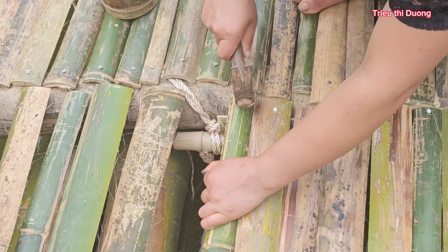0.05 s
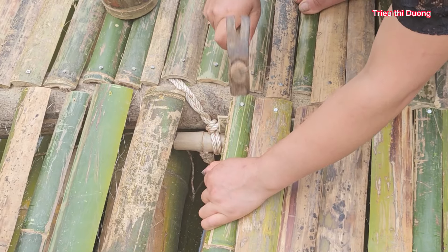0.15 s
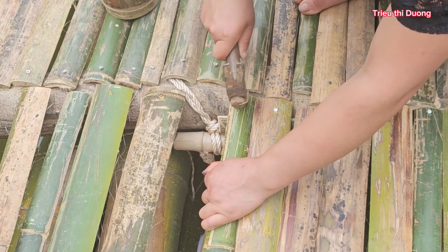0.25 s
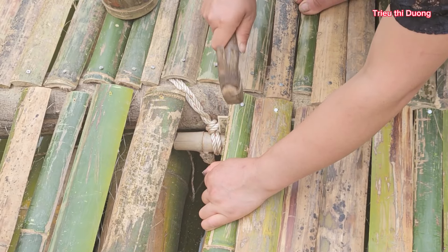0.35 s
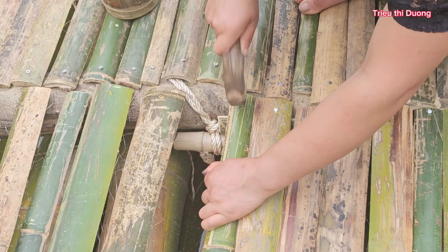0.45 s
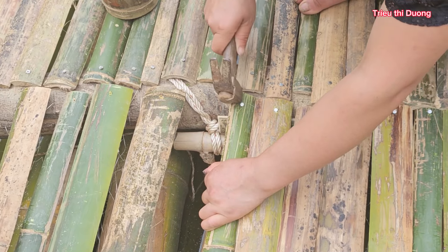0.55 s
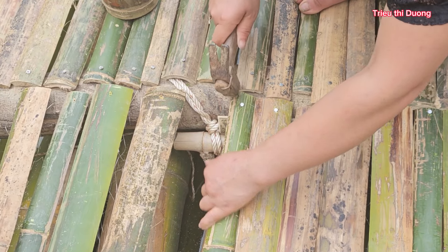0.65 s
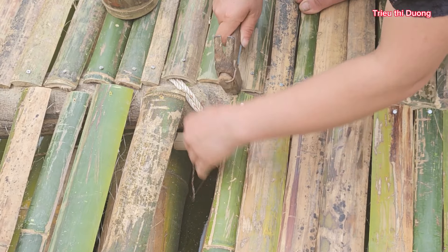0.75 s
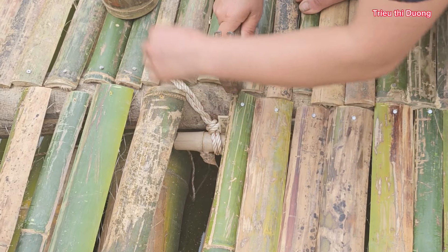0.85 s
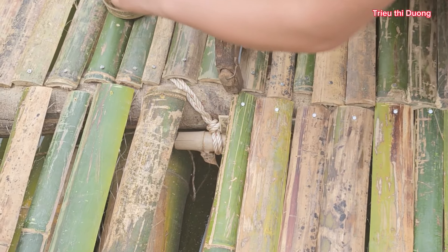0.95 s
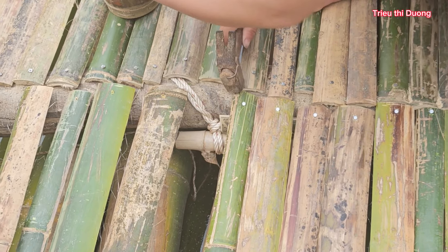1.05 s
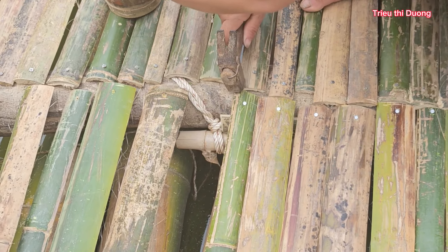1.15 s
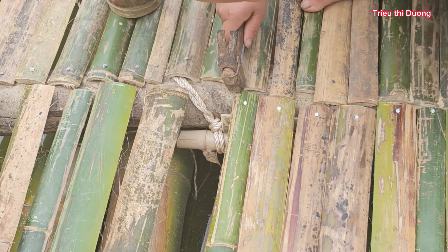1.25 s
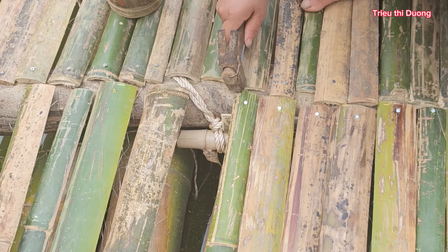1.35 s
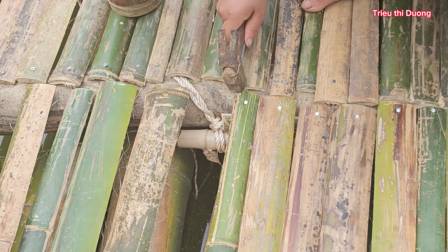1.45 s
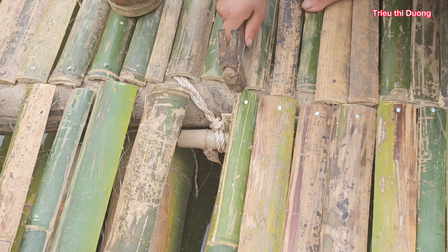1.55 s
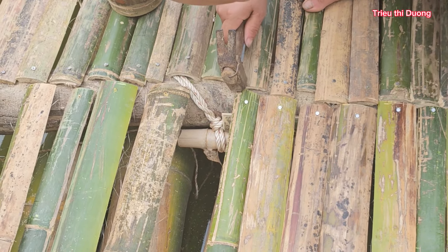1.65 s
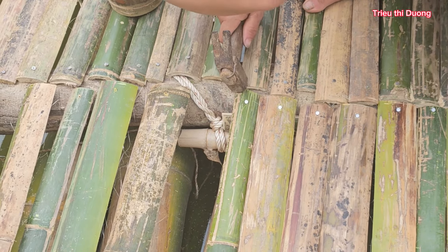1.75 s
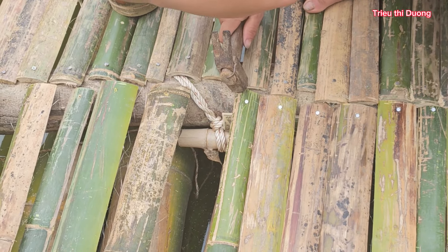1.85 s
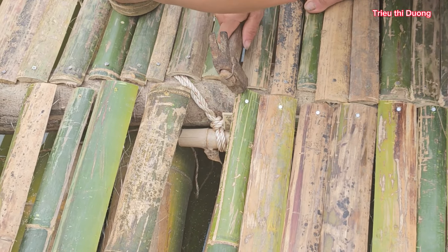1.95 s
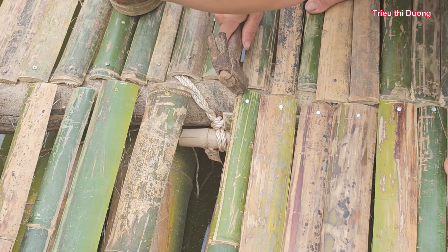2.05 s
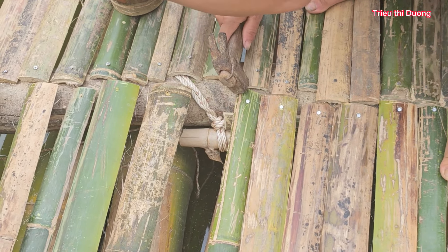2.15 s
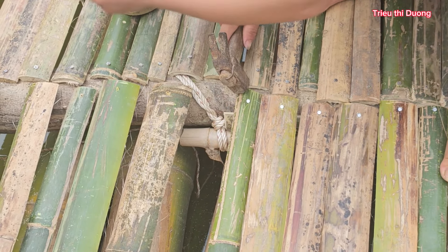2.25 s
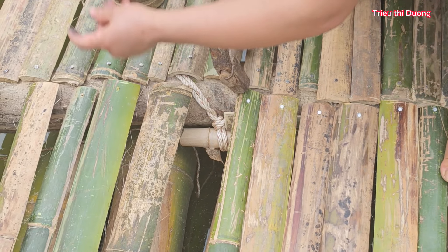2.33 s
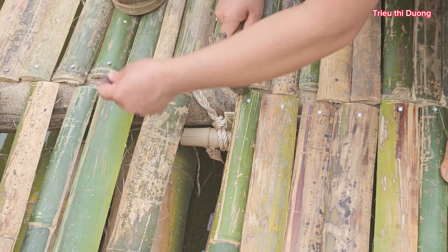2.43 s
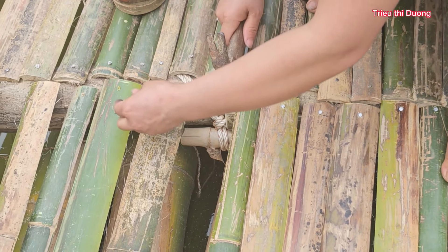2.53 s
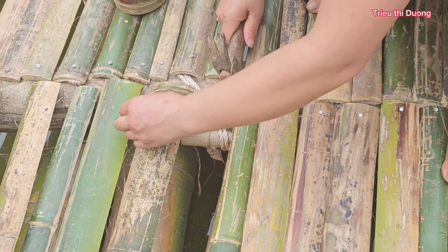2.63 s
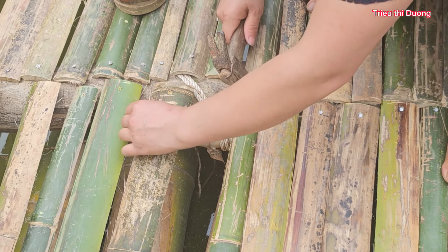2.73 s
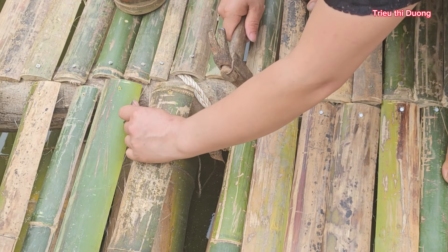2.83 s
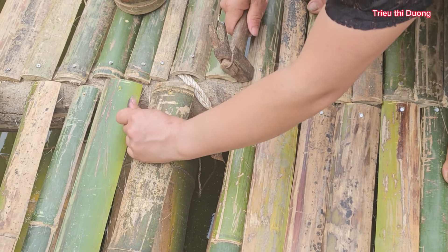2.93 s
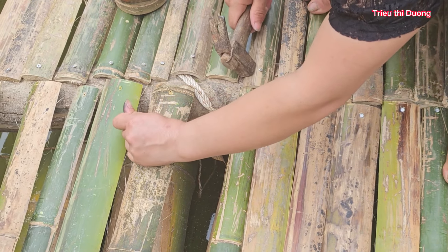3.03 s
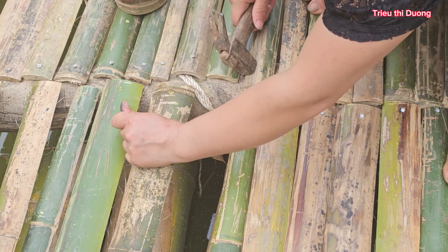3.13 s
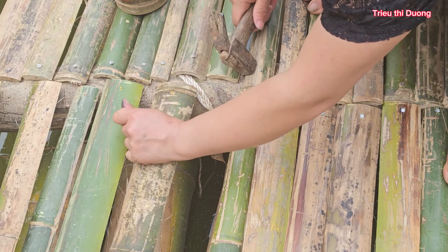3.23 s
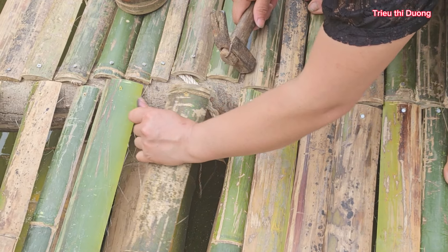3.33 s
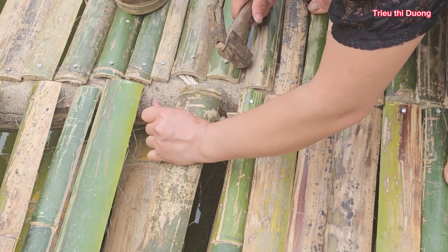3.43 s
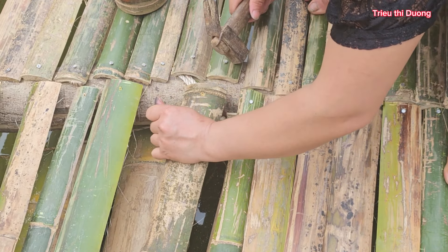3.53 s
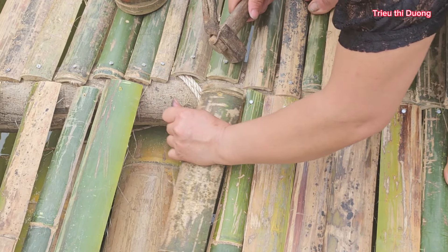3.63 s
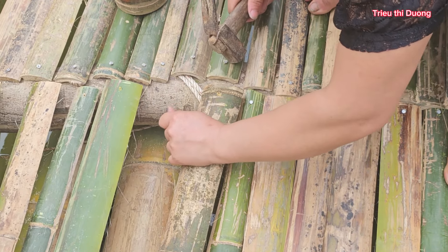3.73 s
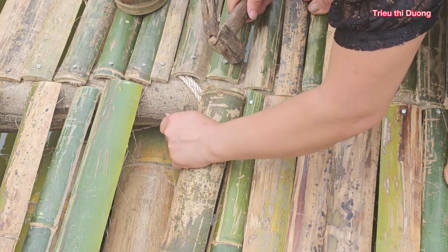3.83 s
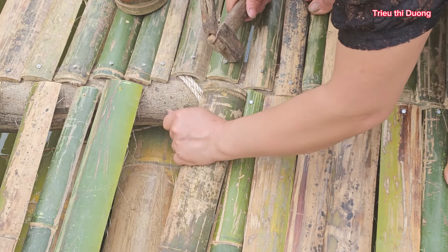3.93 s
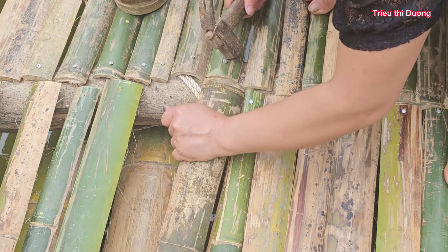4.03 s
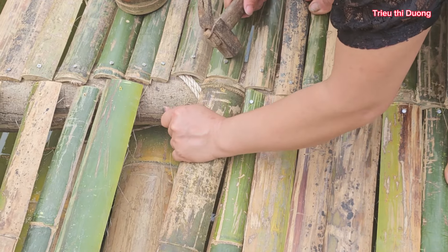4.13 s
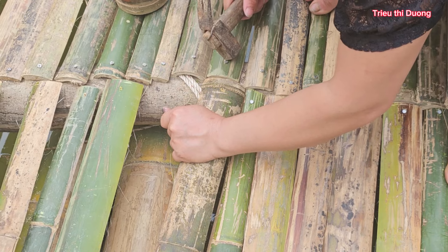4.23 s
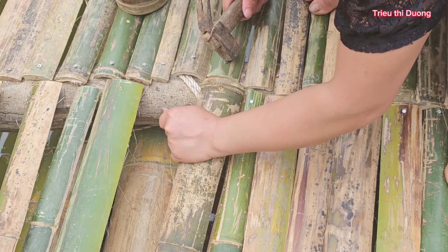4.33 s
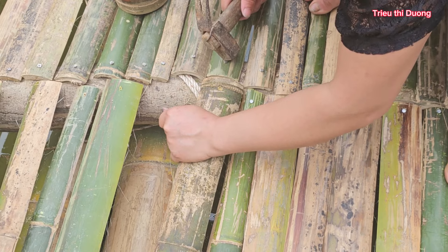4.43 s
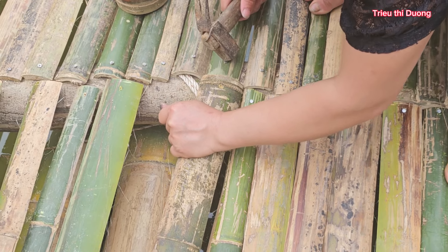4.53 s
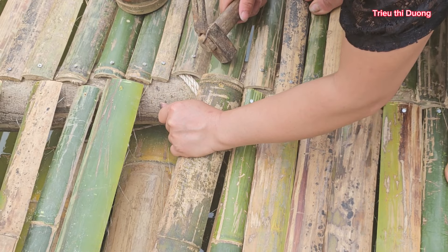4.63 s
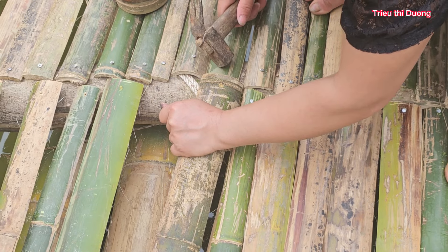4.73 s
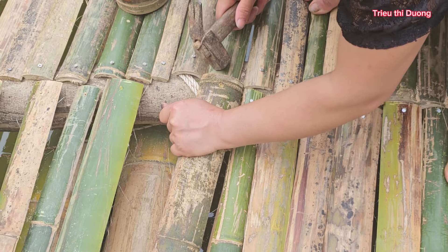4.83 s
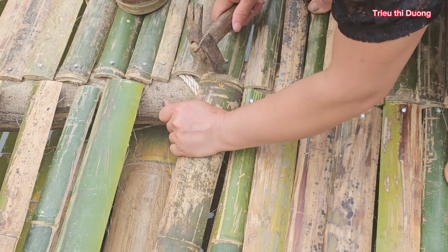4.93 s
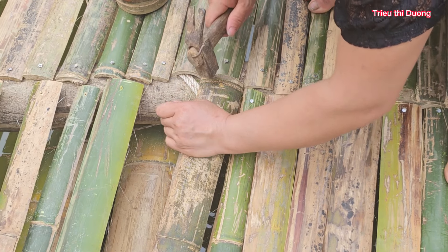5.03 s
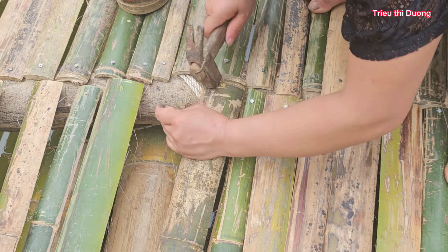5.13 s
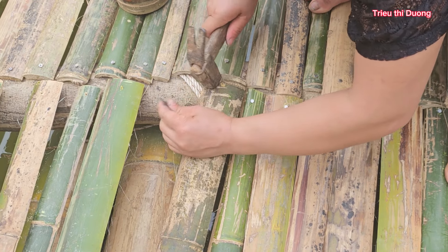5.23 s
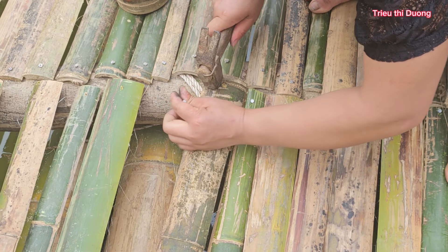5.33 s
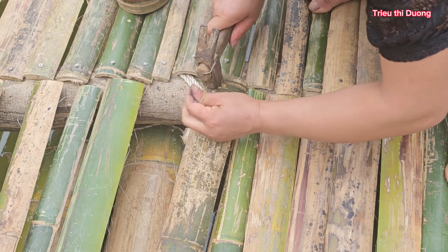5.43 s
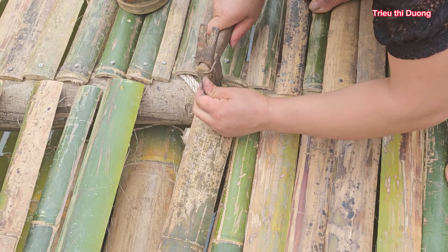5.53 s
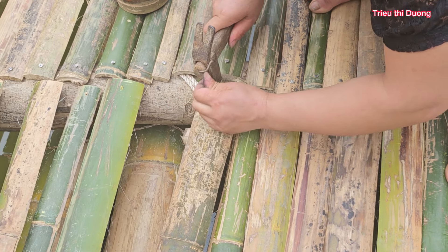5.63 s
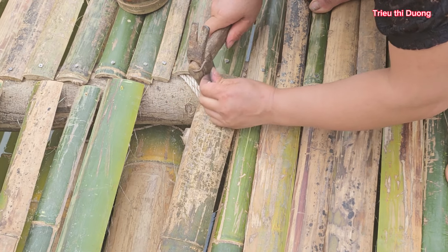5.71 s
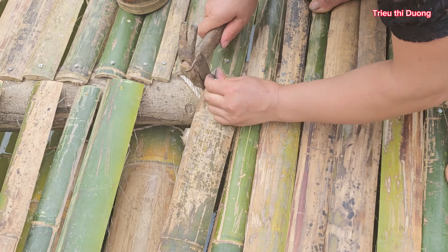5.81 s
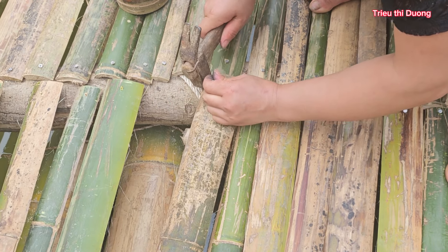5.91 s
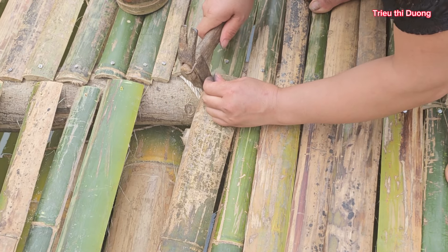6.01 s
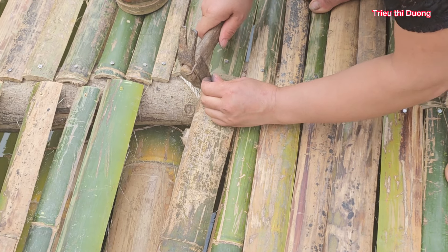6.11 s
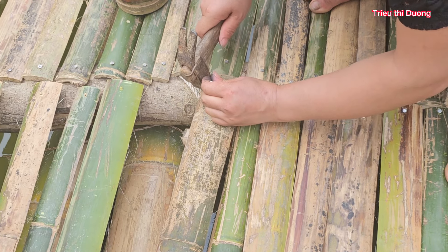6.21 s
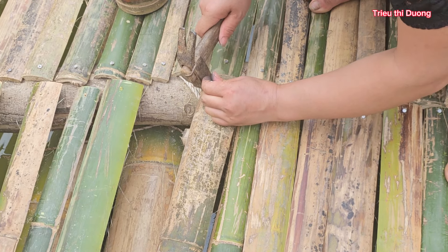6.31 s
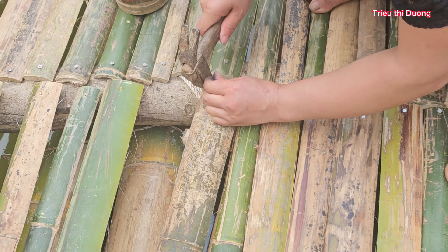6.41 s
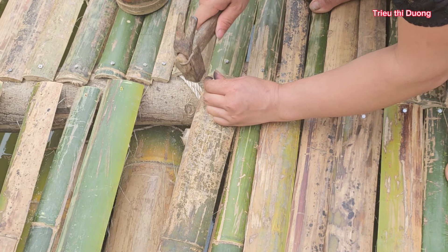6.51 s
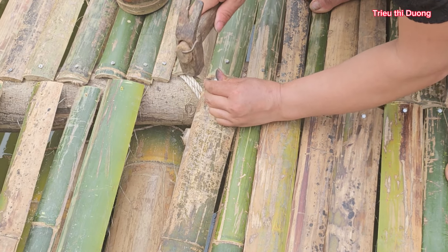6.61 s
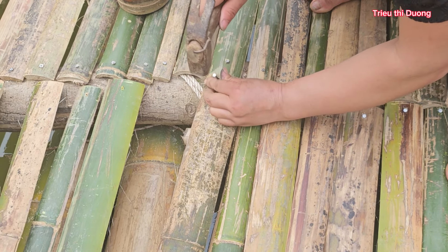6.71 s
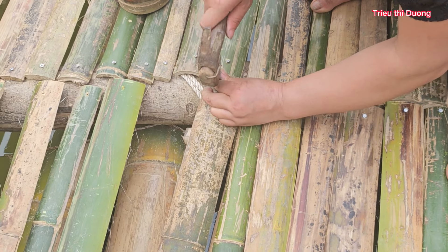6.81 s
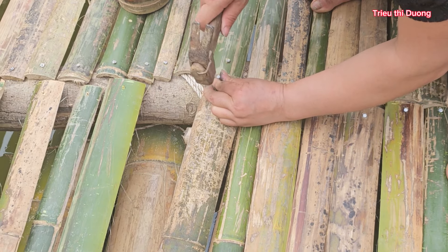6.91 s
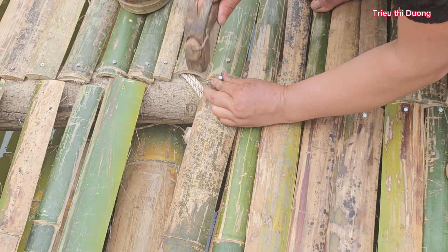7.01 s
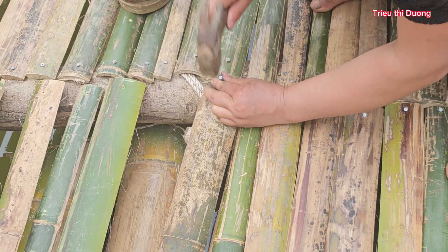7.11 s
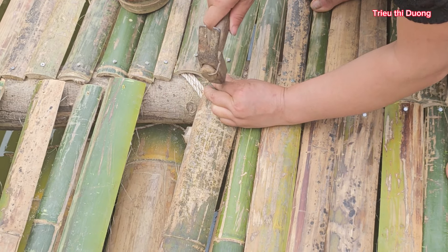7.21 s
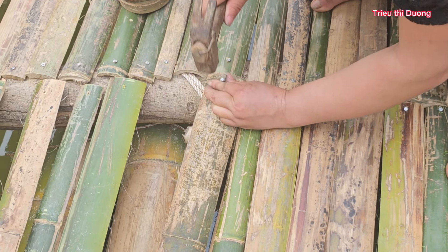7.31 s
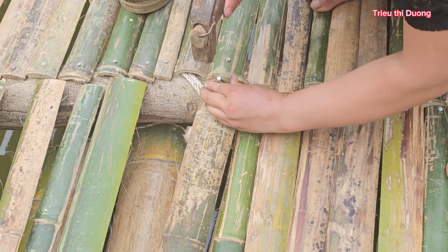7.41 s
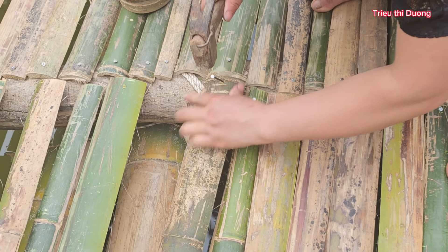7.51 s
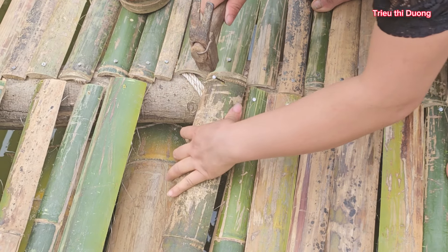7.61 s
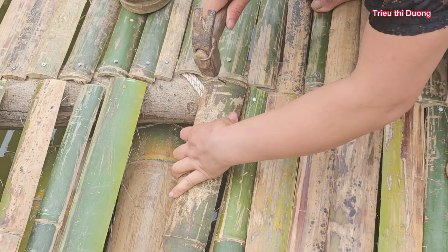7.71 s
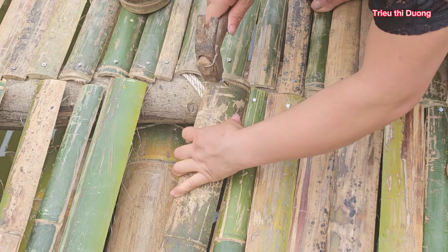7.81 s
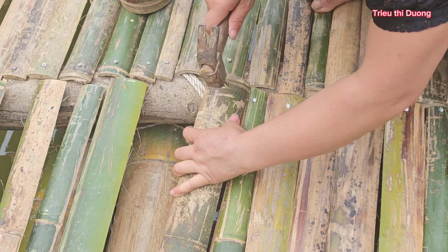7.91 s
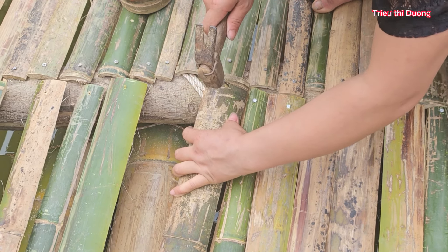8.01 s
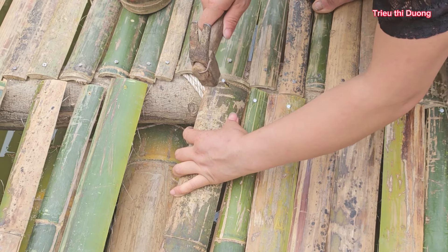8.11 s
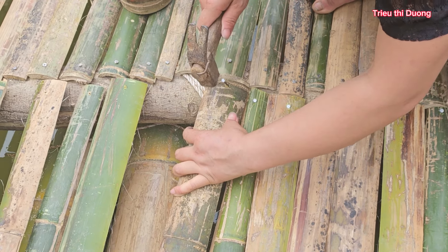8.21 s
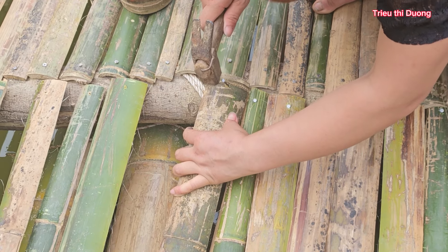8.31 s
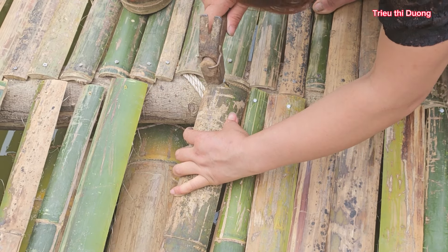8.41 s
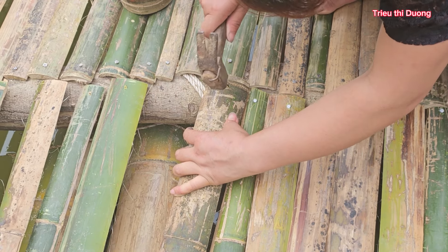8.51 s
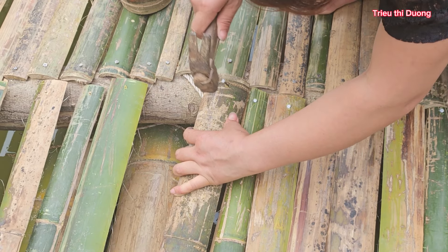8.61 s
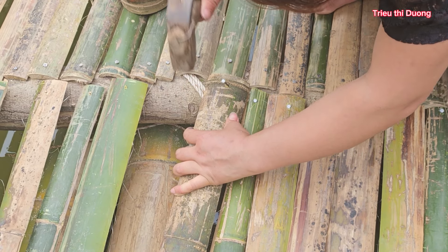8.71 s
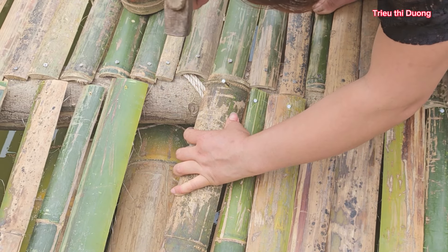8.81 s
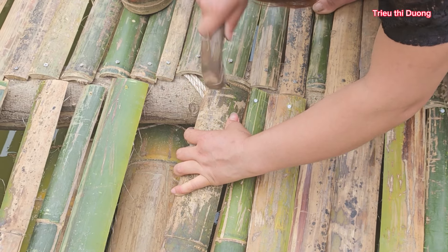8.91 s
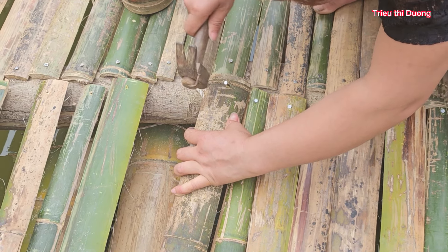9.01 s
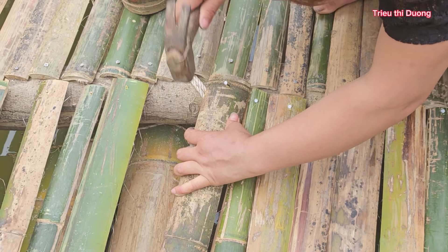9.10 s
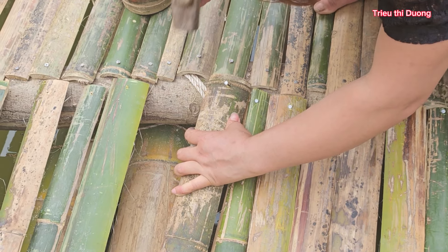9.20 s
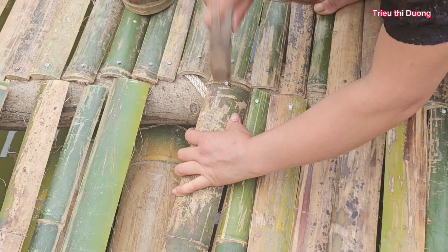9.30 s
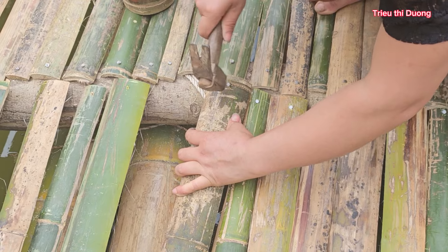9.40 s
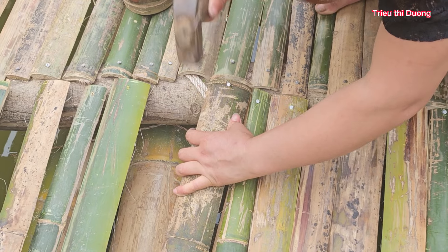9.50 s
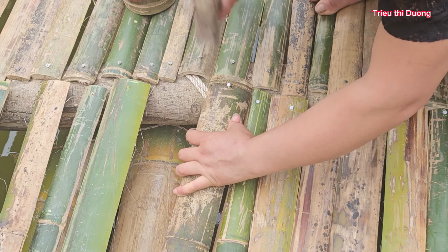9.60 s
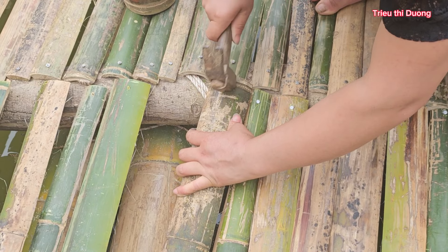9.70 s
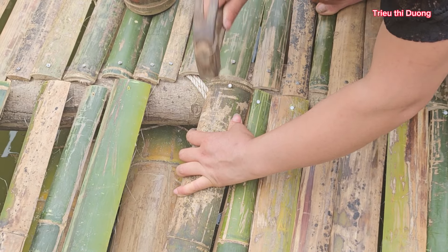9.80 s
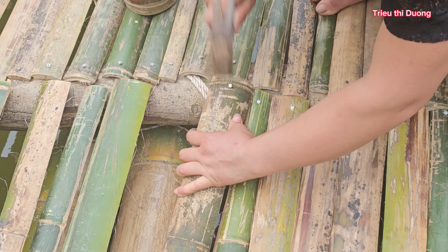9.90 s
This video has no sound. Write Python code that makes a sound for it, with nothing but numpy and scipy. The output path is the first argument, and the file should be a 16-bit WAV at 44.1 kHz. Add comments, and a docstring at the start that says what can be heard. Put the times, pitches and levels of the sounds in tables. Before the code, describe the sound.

Close outdoors on a bamboo deck, a hammer cracks three times on a nail. Light bumps, finger ticks and tiny nail clinks follow, then short dry scrapes as a slat slides into place. A dull hollow clack, two setting taps, the second with a bright ping, and four hard uneven blows finish. Thin insect drone and a repeated swooping bird whistle sit far behind.

```python
"""Hammer blows close by: three finish one nail in split bamboo slats on a pole deck; a slat is slid into place
and a new nail is set and driven. Blows are noise and slat modes in four bands, dulled by contact time, with
rebounds; drags are sparse grains through slat modes; nails and hollow culms are decaying sines.
Behind: an insect drone of shaped noise that sinks and swells, a repeated whistle that swoops up and drops,
far chips and hoots as gliding sines, and forest scatter with a blurred echo as noise tails."""
import sys
import numpy as np
from scipy import signal
from scipy.fft import rfft, irfft, next_fast_len
from scipy.io import wavfile
from scipy.ndimage import map_coordinates

SR = 44100
rng = np.random.default_rng(int(sys.argv[2]) if len(sys.argv) > 2 else 0)


def master_out(mix):
    """Clip the mix to full scale and print it as 16-bit PCM to the path in sys.argv[1]."""
    frames = np.transpose(np.atleast_2d(mix))
    ceiling = np.clip(frames, -1, 1)
    pcm = np.round(ceiling * 32767).astype(np.int16)
    wavfile.write(sys.argv[1], SR, pcm)


N = 438794
TIME = np.arange(N) / SR
RING = np.arange(SR // 2) / SR  # time axis of one event, s


def amp(db):
    """Decibels to gain."""
    return 10 ** (np.asarray(db) / 20)


def unit(x):
    """Scale to rms 1."""
    return x / np.sqrt(np.mean(x ** 2) + 1e-20)


def along(points, hz):
    """Interpolate (f/Hz, value) points on a log frequency axis."""
    f, v = np.transpose(points)
    return np.interp(np.log(hz + 1), np.log(f + 1), v)


def add(track, s, x):
    """Mix x into the track at time s."""
    part = track[..., max(round(s * SR), 0):][..., :x.shape[-1]]
    part += x[..., :part.shape[-1]]


def wobble(rate_hz):
    """Smooth random curve with rate_hz knots a second."""
    knots = rng.standard_normal(int(N * rate_hz / SR) + 4)
    return map_coordinates(knots, [TIME * rate_hz])


def filtered(x, response):
    """Apply a frequency response to x."""
    n = x.shape[-1]
    m = next_fast_len(n + 8192)
    spectrum = rfft(x, m) * response(np.fft.rfftfreq(m, 1 / SR))
    return irfft(spectrum, m)[..., :n]


def coloured(x, spectrum):
    """Shape noise to a spectrum, at rms 1."""
    return unit(filtered(x, lambda hz: amp(along(spectrum, hz))))


def dying(spectrum, t60, size):
    """Two noises, jointly rms 1, whose frequencies decay at their own rates."""
    hz, t, z = signal.stft(rng.standard_normal((2, size)), SR, nperseg=256)
    decay_db = 60 * t / along(t60, hz)[:, None]
    gain = amp(along(spectrum, hz)[:, None] - decay_db)
    return unit(signal.istft(z * gain, SR)[1][:, :size])


# level difference of the two ports: f/Hz, left minus right/dB
PORT_LEAN = [(250, 0), (600, -0.5), (1500, -0.5), (3000, -5.5), (5500, -10.5), (8500, 4.5), (13000, -2.5)]


def ports(pair, apart, lead_ms=0.097):
    """Close source at two microphone ports: left leads; the sides differ more in the treble."""
    mid = pair[0]
    side = apart * filtered(pair[1], lambda hz: 0.38 + hz / (hz + 1500))
    sign = np.array([[1], [-1]])

    def port_response(hz):
        """Half the lean and half the lead, opposite at each port."""
        return amp(sign * along(PORT_LEAN, hz) / 2) * np.exp(sign * 1j * np.pi * hz * lead_ms / 1000)

    return filtered(mid + sign * side, port_response)


# insect chorus level: t/s, level/dB
CHORUS_LEVEL = [(0, -62.5), (1.2, -73), (2.8, -67.5), (5, -67), (9.9, -65)]
# insect spectrum: f/Hz, level/dB
INSECT_SPECTRUM = [(4500, -38), (5700, -15), (6600, -7), (7100, -2.5), (7500, 4), (7900, -7.5),
                   (8300, -14.5), (8900, -44.5)]
# air spectrum: f/Hz, level/dB
AIR_SPECTRUM = [(20, -4), (50, -9.5), (80, -9), (98, 2.5), (120, -10), (250, -8.5), (450, -22.5),
                (800, -21.5), (2000, -25.5), (3000, -28), (4200, -19), (5200, -26.5), (9000, -45),
                (16000, -40)]


def outdoors():
    """Shimmering insect noise over the low hush of the air."""
    chorus_db = np.interp(TIME, *np.transpose(CHORUS_LEVEL))
    chorus_db += 0.38 * wobble(1.0) + .5 * wobble(76)
    chorus = amp(chorus_db) * coloured(rng.standard_normal((2, N)), INSECT_SPECTRUM)
    hush = ports(coloured(rng.standard_normal((2, N)), AIR_SPECTRUM), apart=0.91)
    return chorus + amp(-72.0) * hush * amp(0.61 * wobble(10))


def foliage(song, t60):
    """Leaves on the way smear a bird's note: convolution with decaying noise."""
    leaves = rng.standard_normal((2, len(RING))) * amp(-60 * RING / t60)
    return signal.fftconvolve(song[None], leaves / np.linalg.norm(leaves[0]), axes=1)[:, :N]


# thin falling chips of a second bird: t/s, level/dB
CHIP_CALLS = [(2.52, -62.5), (5.742, -56.5), (6.025, -57)]
# far soft hoots: t/s, level/dB
HOOT_CALLS = [(8.22, -69.5), (8.82, -67)]


def far_birds():
    """Quick falling chips and low hoots from deeper in the wood: gliding sines."""
    song = np.zeros(N)
    for calls, length_s, from_hz, to_hz in [(CHIP_CALLS, .035, 5700, 3100), (HOOT_CALLS, .16, 832, 820)]:
        u = RING[RING < length_s] / length_s
        pitch_hz = from_hz + (to_hz - from_hz) * u
        call = np.sin(np.pi * u) * np.sin(2 * np.pi * np.cumsum(pitch_hz) / SR)
        for s, db in calls:
            add(song, s, amp(db) * call)
    return foliage(song, t60=0.11)


# scatter decay: f/Hz, t60/s
FOREST_T60 = [(100, 6.2), (300, 0.57), (900, 0.59), (2500, 0.68), (4500, 0.62), (8000, .7), (14000, 1.3)]
# scatter spectrum: f/Hz, level/dB
FOREST_SPECTRUM = [(50, 3.5), (120, 8), (200, -6), (400, 1), (800, -4.5), (2000, 5.5), (4000, 2.5),
                   (8000, 0.5), (15000, -7)]
# spectrum sent back by the edge of the wood: f/Hz, level/dB
ECHO_SPECTRUM = [(700, -7.5), (1500, -2.5), (3500, 1.5), (5000, -4), (9000, -13)]


def forest(x, echo_db, echo_s):
    """Scatter from trunks and leaves, with a blurred echo off the edge of the wood."""
    wet, t = np.zeros((2, N)), np.arange(SR) / SR
    hop = SR // 3  # each block gets fresh random scatter
    for start in range(0, N, hop):
        tail = dying(FOREST_SPECTRUM, FOREST_T60, size=SR) * (1 - np.exp(-t / 0.0054))
        blur = np.exp(-((t - echo_s) / .045) ** 2)
        tail += amp(echo_db) * unit(coloured(rng.standard_normal((2, SR)), ECHO_SPECTRUM) * blur)
        tail /= np.linalg.norm(tail[0])
        add(wet, start / SR, signal.fftconvolve(x[None, start:start + hop], tail, axes=1))
    return wet


ONSET_DB, SLUR_DB = -10.5, -25  # against the held note
START_HZ, SLUR_HZ, SAG_HZ_PER_S = 2830, 2460, 4000  # the slur sinks
RISE_S, HOLD_S, DROP_S, SLUR_S = 0.036, 0.013, 0.043, .09
QUAVER_HZ, QUAVER_RATE_HZ = 70, 130  # random pitch tremble


def whistle(held_hz):
    """One note: a sine swoops up, holds, drops and ends in a faint sinking slur."""
    risen, held, dropped, end = np.cumsum([RISE_S, HOLD_S, DROP_S, SLUR_S])
    t = RING[RING < end]
    rise = np.sin(np.pi / 2 * np.minimum(t / risen, 1) ** 1.1) ** 2
    drop = np.clip((t - held) / DROP_S, 0, 1)
    pitch_hz = START_HZ + (held_hz - START_HZ) * rise + (SLUR_HZ - held_hz) * drop
    pitch_hz -= SAG_HZ_PER_S * np.maximum(t - dropped, 0)
    quaver = map_coordinates(rng.standard_normal(size=64), [t * QUAVER_RATE_HZ])
    pitch_hz += QUAVER_HZ * (1 - drop) * quaver
    level = amp(ONSET_DB * (1 - rise) + SLUR_DB * np.sqrt(drop)) * signal.windows.tukey(len(t), .08)
    return level * np.sin(2 * np.pi * np.cumsum(pitch_hz) / SR)


# whistle starts: t/s
WHISTLE_STARTS_S = [2.634, 3.028, 3.41, 3.81, 4.19, 4.575, 4.965, 5.35, 5.75, 6.142, 6.553, 6.93, 7.315]
WHISTLE_DB, GROWTH_DB_PER_S = -45.5, 0.08
HELD_HZ, EAGER_HZ, SETTLE_S = 4013, 299, 1.9  # the series starts higher and settles


def bird():
    """One repeated whistle, settling lower and growing very slightly, blurred by leaves."""
    song = np.zeros(N)
    for s in WHISTLE_STARTS_S:
        since_s = s - WHISTLE_STARTS_S[0]
        note = whistle(HELD_HZ + EAGER_HZ * np.exp(-since_s / SETTLE_S))
        add(song, s, amp(WHISTLE_DB + GROWTH_DB_PER_S * since_s) * note)
    mix = amp(-14.5) * song + amp(2.5) * foliage(song, t60=0.16)
    mix += amp(-10.0) * forest(song, echo_db=-6.5, echo_s=0.098)
    return mix * amp([[-1.5], [1.5]])  # right is louder


# struck culms: t/s, level/dB, f/Hz, t60/s
HOLLOW_RINGS = [(.869, -40.5, 843, 0.12), (1.486, -39.5, 1054, 0.042), (1.486, -46, 1554, 0.05),
                (4.041, -40, 128, 0.24)]


def hollow():
    """The air and wall of a bumped culm ring briefly: decaying sines."""
    pair = np.zeros((2, N))
    for s, db, hz, t60 in HOLLOW_RINGS:
        add(pair[0], s, amp(db - 60 * RING / t60) * np.sin(2 * np.pi * hz * RING))
    return ports(pair, apart=0)


# clinks in the hand or rings as nails are set: t/s, level/dB, f/Hz
NAIL_PINGS = [(1.398, -71.5, 12340), (1.595, -66, 12500), (1.636, -60.5, 12000), (1.819, -55.5, 12230),
              (2.081, -69, 11800), (2.125, -68, 12500), (7.189, -20, 11830)]


def nails():
    """Steel nails give short high pings of eight close modes."""
    pair = np.zeros((2, N))
    for s, db, hz in NAIL_PINGS:
        modes_hz = hz * (1 + .03 * rng.standard_normal((2, 8, 1)))
        add(pair, s, amp(db - 7 - 60 * RING / 0.065) * np.sin(2 * np.pi * modes_hz * RING).sum(1))
    return ports(pair, apart=0.34)


# second slat's modes, also struck below: f/Hz, width/Hz, level/dB
SECOND_SLAT_MODES = [(134, 16, 2.5), (215.4, 32, -3), (254.4, 22, 0.5), (311, 49, -2.5), (524.7, 13, -3.5),
                     (753, 110, -4), (973, 24.94, -1.5), (1251, 41, 1.5), (1556, 25, -1.5), (1689, 64, 1.5),
                     (2130, 97, 0.5), (3377, 540, -8.5), (3970, 390, -13), (4380, 320, 0.5)]
# shoves over the poles: t/s, length/s, level/dB
SHOVE_EVENTS = [(3.324, 0.064, -66.5), (3.431, .13, -56), (3.673, 0.11, -52), (3.941, 0.12, -57.5),
                (4.575, 0.21, -54.5), (7.526, 0.16, -54.5), (7.838, 0.17, -56.5)]
# stick-slip spectrum: f/Hz, level/dB
JUDDER_SPECTRUM = [(41, -43), (70, -16), (105, -2), (293, 4.5), (333, 4), (533, 4.5), (900, -23.5),
                   (1170, -54), (1980, -120)]
# fibre spectrum: f/Hz, level/dB
RASP_SPECTRUM = [(300, -21.5), (700, 1), (1500, -4.5), (2800, -3), (4500, -6), (7000, -15), (10000, -25),
                 (16000, -26)]
SHOVE_RISE_DB_PER_S, SHOVE_FALL_DB_PER_S = 178.5, 151
RASP_DB = -5  # against the judder


def dragging():
    """Stick-slip over the poles: uneven grains shake the slat's modes and rasp in the fibres."""
    slips = amp(4.5 * wobble(35))

    def grains(rate_hz):
        """Random impulses over a low noise floor."""
        return slips * rng.standard_normal((2, N)) * (.07 + (rng.random(N) < rate_hz / SR))

    def slat(f):
        """Sum of mode resonances plus a direct path."""
        return 1.1 + sum(amp(db) / (1 + 1j * (f - hz) / width) for hz, width, db in SECOND_SLAT_MODES)

    judder = coloured(filtered(grains(110), slat), JUDDER_SPECTRUM)
    rasp = coloured(filtered(grains(700), slat), RASP_SPECTRUM)
    effort = np.zeros(N)
    for s, length_s, db in SHOVE_EVENTS:
        fade_db = SHOVE_RISE_DB_PER_S * np.maximum(s - TIME, 0)
        fade_db += SHOVE_FALL_DB_PER_S * np.maximum(TIME - s - length_s, 0)
        effort = np.maximum(effort, amp(db - fade_db))
    return ports(effort * (judder + amp(RASP_DB) * rasp), apart=0.44)


def softened(x, contact_ms):
    """A contact hardly excites vibrations faster than its own length: second-order low-pass."""
    corner_hz = 1000 / contact_ms
    return filtered(x, lambda hz: 1 / (1 + 1j * np.sqrt(2) * hz / corner_hz - (hz / corner_hz) ** 2))


# thud, knock, crack, sizzle: low edge/Hz, high edge/Hz
STRIKE_BANDS = [(175, 600), (600, 2800), (2800, 8500), (8500, 16000)]
# first slat's modes: f/Hz, width/Hz, level/dB
FIRST_SLAT_MODES = [(200.2, 12, -2), (237.5, 18, 3.5), (285.6, 6, -2.5), (325.8, 22, 6.5), (520.8, 17, 1),
                    (594, 33, -3), (720, 35, -0.5), (1300, 60, -7.5), (1390, 35, -5), (2130, 63, -7.5),
                    (3603, 82, -1), (3610, 75, 0.5), (4322, 100, -2), (5330, 83, -5.5)]
# dense deck modes: f/Hz, level/dB
DECK_SPECTRUM = [(40, -15.5), (100, 2.5), (200, 5.5), (700, 1.5), (2000, 1), (2800, -13), (3800, -1),
                 (6000, -7), (8000, -12), (10000, -24), (15000, -10.5)]
# deck decay: f/Hz, t60/s
DECK_DECAY = [(100, 0.92), (300, .2), (800, 0.2), (2000, 0.13), (5000, 0.145), (14000, .12)]
SLAT_CHANGE_S = 1.2
CRACK_DB, SIZZLE_DB = 2.5, 3.5  # over the knock, before contact time dulls them
FIRST_SLAT_CRACK_DB = 5  # the narrow green slat cracks this much harder


def strike(s, db, weight_db, contact_ms, contact_db, modes_db, rebound_s, rebound_db):
    """One contact: brief crack, slat modes, dense deck ring and boom; a longer contact is duller."""
    if s < SLAT_CHANGE_S:
        slat, boom_db, hard_db = FIRST_SLAT_MODES, -19, FIRST_SLAT_CRACK_DB
    else:
        slat, boom_db, hard_db = SECOND_SLAT_MODES, -11, 0
    hz, width, mode_db = np.transpose(slat)[:, :, None]
    chance = rng.standard_normal((3, len(hz), 1))  # random level, pitch, polarity
    swing = np.sin(2 * np.pi * hz * (1 + .003 * chance[1]) * RING) * np.sign(chance[2])
    modes = amp(mode_db + 1.5 * chance[0]) * np.sqrt(width) * np.exp(-np.pi * width * RING) * swing
    crack = coloured(rng.standard_normal((2, len(RING))), DECK_SPECTRUM) * np.exp(-RING / .0024)
    body = dying(DECK_SPECTRUM, DECK_DECAY, size=len(RING)) + amp(contact_db) * unit(crack)
    body[0] += amp(modes_db) * unit(modes.sum(0))
    # the slat springs up and rattles back: two duller slaps, the second weaker
    slap_spectrum = [(500, 0.5), (1800, 2.5), (4500, -14.0), (14000, -31)]
    slap_t60 = [(300, 0.14), (5000, 0.063)]
    for delay, offset_db in [(1, 3), (1.7, -2.5)]:
        slap = dying(slap_spectrum, slap_t60, size=4096)
        slap *= np.sqrt(len(RING) / slap.shape[1])  # same energy as a full-length ring
        add(body, rebound_s * delay, amp(rebound_db + offset_db) * slap)
    out = np.zeros_like(body)
    band_db = [weight_db, 0, CRACK_DB + hard_db, SIZZLE_DB]
    for (lo, hi), level_db in zip(STRIKE_BANDS, band_db):
        band = signal.sosfilt(signal.butter(4, (lo, hi), "band", fs=SR, output="sos"), body)
        out += amp(level_db) * band / np.std(band[0, :SR // 25])  # level over the first 40 ms
    # the poles underneath give with a dull boom
    boom = rng.standard_normal(len(RING))
    boom = signal.sosfilt(signal.butter(1, (85, 130), "band", fs=SR, output="sos"), boom)
    boom = signal.sosfilt(signal.butter(2, 200, fs=SR, output="sos"), boom)
    out[0] += amp(weight_db + boom_db - 60 * RING / .5) * unit(boom)
    return amp(db) * softened(out, contact_ms)


# slats, hand and hammer head bump the deck: t/s, level/dB, thud weight/dB, contact/ms
DECK_KNOCKS = [(0.73, -68, 20.5, 0.38), (.871, -55, 7, 0.93), (1.485, -56, 0, 0.48), (1.899, -63, -4, 0.15),
               (2.07, -57.5, -2, 0.38), (2.301, -86, 11, 0.71), (3.418, -64, 4.5, .2),
               (3.717, -54.5, 2, 0.27), (3.787, -64, 8.5, .14), (4.038, -64, 13.5, 0.24),
               (4.358, -74, 14, 0.16), (4.498, -61, -6, .55), (5.071, -69.5, 21, 0.25),
               (5.865, -68.5, 15, 0.5), (7.523, -61, 4.5, 0.29), (7.571, -60, 1, 0.17),
               (7.8, -46.5, 0.5, 0.42), (7.935, -55, 5, .36), (8.01, -58.5, 2.5, 0.38),
               (8.37, -78.5, 10, 0.42)]
# fingers and fibres tick on the bamboo: t/s
TICK_TIMES_S = [1.775, 1.937, 2.002, 2.141, 2.763, 2.922, 2.971, 3.888, 4.127, 6.719, 7.68, 7.763]
TICK_DB = -71


def knocks():
    """Light bumps and ticks while the slat is placed: weak strikes."""
    pair = np.zeros((2, N))
    for s, db, weight_db, contact_ms in DECK_KNOCKS:
        add(pair, s, strike(s, db, weight_db, contact_ms, contact_db=0, modes_db=2,
                            rebound_s=.011, rebound_db=-9))
    for s in TICK_TIMES_S:
        tick_db = TICK_DB + rng.standard_normal()
        add(pair, s, strike(s, tick_db, weight_db=-14, contact_ms=0.22, contact_db=-3.5, modes_db=-4,
                            rebound_s=rng.uniform(0.013, 0.014), rebound_db=-10.5))
    return ports(pair, apart=1.0)


# dull clacks, a slat dropping and a hammer tap on the deck: t/s, level/dB, thud weight/dB
DULL_CLACKS = [(5.153, -27, -7), (9.9125, -35, 2)]
CLACK_TOP_HZ = 2745  # a dull clack is 20 dB weaker well above this


def clacks():
    """A dense, hollow clack with hardly any crack: low-passed strikes."""
    pair = np.zeros((2, N))
    for s, db, weight_db in DULL_CLACKS:
        add(pair, s, strike(s, db, weight_db, contact_ms=0.25, contact_db=3.5, modes_db=3,
                            rebound_s=.014, rebound_db=-5.5))
    dulled = filtered(pair, lambda hz: .1 + .9 / (1 + (hz / CLACK_TOP_HZ) ** 12))
    return ports(dulled, apart=.42)


# blows: t/s, level/dB, thud weight/dB, contact/ms, rebound delay/s, rebound level/dB
HAMMER_BLOWS = [(.029, -27.5, 4.5, 0.08, 0.0047, -6), (0.2798, -27, 4, 0.12, .008, -7),
                (.514, -27.5, 2.5, 0.18, 0.0042, -9), (5.136, -47.5, -10, .15, 0.0057, -13),
                (6.866, -36, -.5, 0.27, .006, -5.5), (7.189, -32, -4, 0.061, 0.0074, 5),
                (8.5186, -25, -11.5, .135, 0.0045, -3), (8.9672, -23, -6.5, .075, .0047, -4.5),
                (9.362, -27.5, 0.5, 0.029, 0.018, 0), (9.692, -24.5, -1, .13, .013, -4.5)]
# steel head ring: f/Hz, t60/s, level against the blow/dB
HEAD_RING = (8230, .45, -23.5)


def hammer():
    """Hard blows on nail and slat, each with a rebound; the steel head rings on faintly."""
    pair = np.zeros((2, N))
    head_hz, head_t60, head_db = HEAD_RING
    for s, db, weight_db, contact_ms, rebound_s, rebound_db in HAMMER_BLOWS:
        add(pair, s, strike(s, db, weight_db, contact_ms, contact_db=5, modes_db=4.5,
                            rebound_s=rebound_s, rebound_db=rebound_db))
        head = amp(db + head_db - 60 * RING / head_t60) * np.sin(2 * np.pi * head_hz * RING)
        add(pair[0], s, head)
    return amp(-0.5) * ports(pair, apart=0.42)


def scene():
    """Work on the deck in front, the forest around."""
    background = outdoors() + far_birds() + bird()
    work = hollow() + dragging() + knocks() + clacks() + hammer()
    answer = amp(-25.0) * forest(work.mean(0), echo_db=-11.5, echo_s=.13)
    return background + answer + nails() + work


TOP_HZ = 16000  # middle of the 700 Hz wide cutoff


def record(dry):
    """Round peaks at full scale; cut the band above the limit."""
    rounded = dry / (1 + np.abs(dry) ** 6) ** (1 / 6)
    return filtered(rounded, lambda hz: np.clip((TOP_HZ - hz) / 700 + .5, 0, 1))


dry = scene()
out = record(dry)
master_out(out)
```